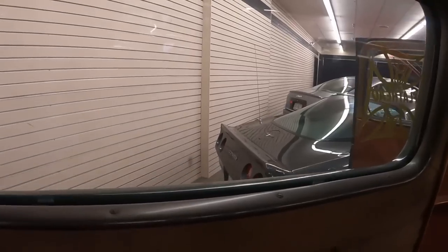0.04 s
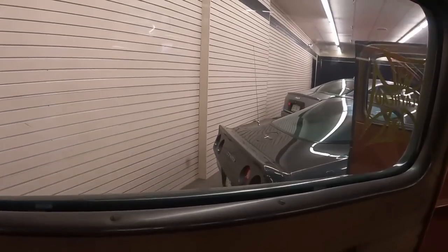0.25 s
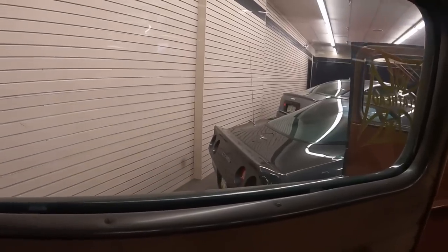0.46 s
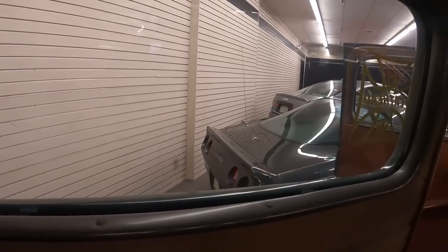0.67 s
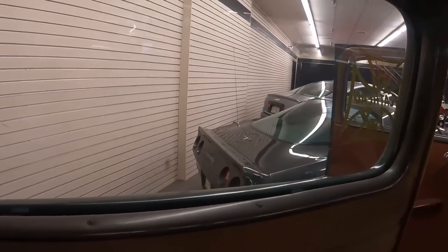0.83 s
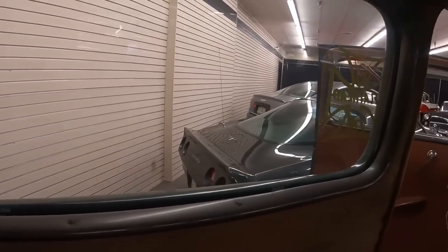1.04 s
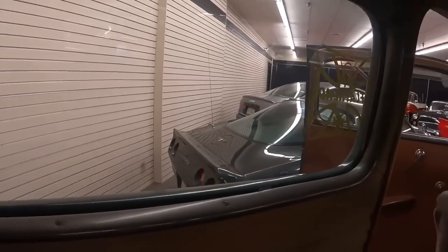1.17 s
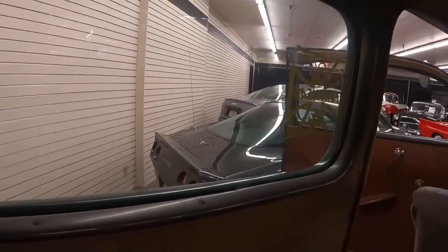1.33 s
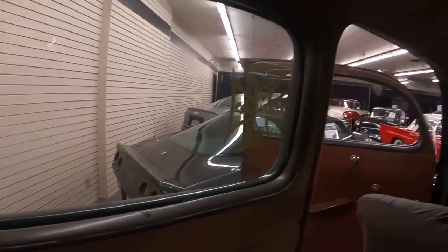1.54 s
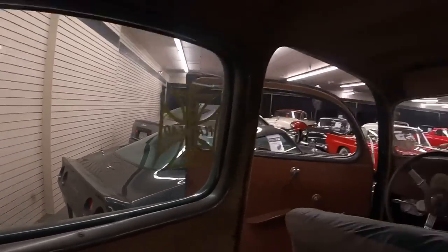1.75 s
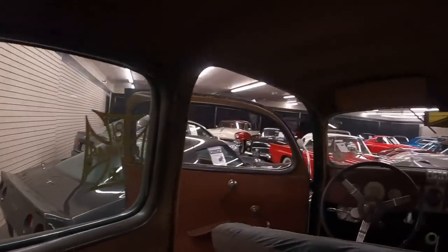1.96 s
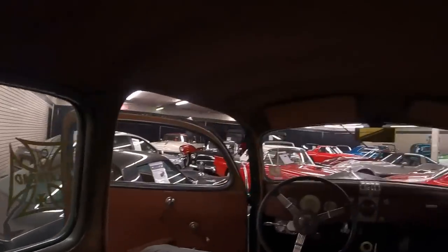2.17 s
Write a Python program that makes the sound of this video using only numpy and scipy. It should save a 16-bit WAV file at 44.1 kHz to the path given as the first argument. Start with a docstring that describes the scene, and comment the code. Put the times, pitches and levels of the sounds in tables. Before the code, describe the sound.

Inside an old car, a window crank turns close to the microphone; the door booms dully, glass rubs and squeals in bursts, the mechanism clicks, then near silence with faint rustle and quiet hall hiss.

```python
"""A side window is wound by its crank inside an old car, heard close by in stereo, then comes to rest.
The door panel and cabin boom (shaped noise); the glass scrapes in its channel (three bands of rubbing noise).
Where the glass binds it judders into a rough squeal: overtones on one unsteady pitch over a gated rasp.
The mechanism ticks now and then (short ringing noise bursts); behind it a quiet hall hisses and
a faint rustle follows as things settle."""
import sys
import numpy as np
from scipy import signal
from scipy.fft import rfft, irfft, next_fast_len
from scipy.io import wavfile
from scipy.ndimage import uniform_filter1d, map_coordinates

SR = 44100
rng = np.random.default_rng(int(sys.argv[2]) if len(sys.argv) > 2 else 0)


def file_out(sig):
    """Save sig as 16-bit WAV at sys.argv[1]."""
    # one column per channel
    cols = np.atleast_2d(sig).T
    # limit, then scale
    lim = np.clip(cols, -1, 1)
    pcm = np.round(lim * 32767).astype(np.int16)
    wavfile.write(sys.argv[1], SR, pcm)


N = 97020  # samples, 2.2 s

# Boom of the door over time: time_s, deep_level_db, panel_low_level_db, panel_high_level_db
BOOM_LEVELS = [(0.0, -34.5, -48.5, -51.5), (0.05, -33.5, -57, -42), (0.14, -32, -32.5, -48),
               (0.2, -36.5, -40, -47.5), (0.24, -26.5, -29.5, -33.5), (0.36, -28, -51, -40.5),
               (0.43, -23.5, -28, -28), (0.48, -22.5, -24, -37), (0.52, -20, -29, -25),
               (0.6, -43, -25, -37), (0.63, -33.5, -25, -33), (0.7, -32.5, -32, -38),
               (0.77, -29, -37, -31.5), (0.8, -26, -28, -31.5), (0.87, -36, -39.5, -40.5),
               (0.92, -26, -21.5, -28), (0.99, -24, -33.5, -23), (1.04, -23, -16.5, -27.5),
               (1.1, -26, -23, -37), (1.15, -34.5, -26, -27), (1.22, -32.5, -24, -24.5),
               (1.33, -34, -39, -32.5), (1.36, -31.5, -22, -39.5), (1.41, -34.5, -25, -30.5),
               (1.46, -46, -30, -34), (1.52, -26.5, -54, -42), (1.57, -38, -41.5, -38.5),
               (1.68, -37, -51, -55.5), (1.95, -39, -48.5, -44), (2.05, -49.5, -59, -62),
               (2.2, -37, -69, -52)]
# Spectrum of the deep cabin air: freq_hz, relative_density_db (per Hz)
CABIN_AIR_SPECTRUM = [(10, -38.5), (22, -14), (32, -6), (42, -3), (54, 4), (66, -6), (80, -26.5),
                      (120, -90.5)]
# Spectrum of the panel's modes: freq_hz, relative_density_db (per Hz)
PANEL_SPECTRUM = [(45, -46.5), (64, -6.5), (75, -13), (91, 5.5), (105, -19.5), (125, -8), (149, -12.5),
                  (176, -13.5), (200, -34), (260, -41.5), (400, -120)]
PANEL_SPLIT_HZ = 110  # between the panel's low and high modes


def boom():
    """Cabin air and door panel shaken by the crank: low noise shaped by their modes."""
    deep_db, *panel_db = curves(BOOM_LEVELS)
    deep = even(rush(gain_of(CABIN_AIR_SPECTRUM), grain_db=0), size=5000)
    out = amp(deep_db) * deep
    for level_db, gain in zip(panel_db, halves(PANEL_SPECTRUM, PANEL_SPLIT_HZ)):
        modes = even(rush(gain, grain_db=0.5), size=4000)
        out = out + amp(level_db + 1.3 * wobble(13.44)) * modes
    return out


# Rubbing over time, middle and hiss before a fixed lift:
# time_s, low_grind_level_db, high_grind_level_db, middle_level_db, hiss_level_db
RUB_LEVELS = [(0.0, -59, -55, -62, -69), (0.02, -56.5, -67, -64.5, -68.5), (0.08, -49, -53.5, -63.5, -63.5),
              (0.12, -52, -61.5, -56, -63.5), (0.15, -43.5, -52.5, -53, -63), (0.2, -52, -55.5, -66, -64),
              (0.24, -46.5, -48.5, -61, -59), (0.38, -33.5, -48, -46, -57), (0.42, -44.5, -49, -58, -61),
              (0.51, -39.5, -48.5, -55.5, -61), (0.57, -42, -48, -58.5, -62.5),
              (0.65, -51.5, -59.5, -59.5, -63.5), (0.69, -45, -48, -53.5, -63),
              (0.78, -44.5, -52, -50, -64), (0.85, -48, -58.5, -57, -64.5), (0.884, -46, -51, -62, -61),
              (0.896, -43, -44.5, -52, -58.5), (0.96, -32, -38.5, -50, -57), (1.0, -29, -36, -48, -55.5),
              (1.03, -43.5, -51.5, -59, -63), (1.11, -33, -45, -43, -64.5), (1.14, -41, -47.5, -49.5, -71),
              (1.19, -31.5, -33, -35.5, -71.5), (1.26, -45.5, -57.5, -70, -71),
              (1.32, -54, -56, -66.5, -66), (1.4, -45.5, -45.5, -43, -62), (1.42, -26.5, -37, -41.5, -56.5),
              (1.47, -40.5, -50, -72, -72.5), (1.57, -52.5, -67.5, -74, -75), (1.66, -69, -83, -77.5, -80),
              (1.71, -63, -76.5, -75, -76), (1.84, -66, -77.5, -85.5, -87),
              (1.99, -56, -71.5, -75.5, -78.5), (2.03, -67.5, -80, -87.5, -95),
              (2.17, -67.5, -82, -79.5, -76.5), (2.2, -58, -68, -70.5, -65)]
# Spectrum of the grind: freq_hz, relative_density_db (per Hz)
GRIND_SPECTRUM = [(120, -37), (200, -1.5), (243, 3.5), (344, -10.5), (417, -12.5), (515, -15.5), (559, -20),
                  (679, -19.5), (750, -27), (980, -50), (1650, -120)]
# Spectrum of the middle rub: freq_hz, relative_density_db (per Hz)
MIDDLE_SPECTRUM = [(600, -38), (800, 1.5), (1000, -1), (1270, 5), (1450, 3.5), (1900, -14.5), (2600, -7.5),
                   (4000, -49)]
# Spectrum of the hiss before the pane's lifts: freq_hz, relative_density_db (per Hz)
HISS_SPECTRUM = [(1180, -21.5), (2000, 3.5), (2440, -6.5), (2720, -1), (3290, -4.5), (3590, -2),
                 (4010, -7.5), (5940, -7), (12000, -25.5), (13200, -35)]
# Resonances of the pane: pitch_hz, width_hz, lift_db
PANE_RESONANCES = [(2450, 79, -4), (3080, 94, 5.5), (3270, 100, -2.5), (4800, 170, 4), (6000, 120, -5),
                   (6870, 150, 3.5)]
GRIND_SPLIT_HZ = 390  # between the low and high grind


def pane_gain(hz):
    """Response of the hiss, lifted in a bell around each resonance of the glass."""
    lift_db = sum(db / (1 + (2 * (hz - centre) / width) ** 2) for centre, width, db in PANE_RESONANCES)
    return amp(along(HISS_SPECTRUM, hz) + lift_db)


def scrape():
    """Glass rubbing the channel: a low grind, a middle rub and a hiss lifted by the pane's resonances."""
    *grind_db, middle_db, hiss_db = curves(RUB_LEVELS)
    flutter_db = 1.4 * wobble(30.75)  # shared by all the bands
    rub = amp(middle_db + 2) * rush(gain_of(MIDDLE_SPECTRUM), grain_db=1.5)
    rub = rub + amp(hiss_db + 1.5) * rush(pane_gain, grain_db=1.5)
    for level_db, gain in zip(grind_db, halves(GRIND_SPECTRUM, GRIND_SPLIT_HZ)):
        rub = rub + amp(level_db) * rush(gain, grain_db=0.5)
    return amp(flutter_db) * rub


# Squeal over time, levels before a fixed trim:
# time_s, fundamental_level_db, neighbour_level_db, octave_level_db, roughness (0-1)
SQUEAL_LEVELS = [(0.08, -68, -75, -80, 0.47), (0.142, -52.5, -73, -69, 0.54),
                 (0.166, -46.5, -66, -83.5, 0.54), (0.24, -86, -63, -75.5, 0.31),
                 (0.314, -54, -48.5, -73, 0.3), (0.334, -56, -62, -69, 0.54), (0.37, -50, -46, -45, 0.44),
                 (0.394, -52, -44, -65, 0.37), (0.416, -63, -69.5, -72, 0.53),
                 (0.514, -63, -59.5, -74, 0.42), (0.582, -59, -61, -66, 0.46), (0.602, -53, -63, -64, 0.41),
                 (0.613, -40, -42.5, -46.5, 0.15), (0.63, -50, -52, -56, 0.28),
                 (0.656, -51, -67, -54, 0.53), (0.688, -45, -52, -61, 0.5),
                 (0.712, -33.5, -37, -31.5, 0.44), (0.75, -41, -62, -43, 0.3),
                 (0.775, -40, -45.5, -49, 0.64), (0.798, -41.5, -37, -37.5, 0.54),
                 (0.83, -41.5, -45, -58, 0.37), (0.864, -54, -60, -71, 0.44), (0.9, -46.5, -41, -65, 0.35),
                 (0.95, -41, -66, -64, 0.22), (0.994, -47.5, -42, -47.5, 0.36),
                 (1.018, -46, -49.5, -62, 0.31), (1.064, -40, -52, -48.5, 0.22),
                 (1.088, -38.5, -37, -33.5, 0.38), (1.148, -30, -36, -28, 0.35),
                 (1.19, -30, -32, -30.5, 0.65), (1.234, -45, -46, -69.5, 0.4),
                 (1.266, -59.5, -70.5, -72, 0.29), (1.324, -66, -69, -79, 0.3),
                 (1.368, -30, -48, -30, 0.38), (1.39, -27, -33, -26, 0.19),
                 (1.426, -35, -45.5, -38.5, 0.54), (1.45, -49, -56, -65.5, 0.8), (1.48, -66, -72, -82, 0.9)]
# Centre of the unsteady pitch: time_s, pitch_hz
SQUEAL_PITCH = [(0.6, 810), (0.76, 804.5), (0.8, 858), (0.9, 819), (1.15, 805), (1.19, 824.5),
                (1.37, 828.6), (1.42, 820)]
# Higher overtones, before a fixed trim: multiple of the pitch, relative_level_db
OVERTONES = [(3, 2.5), (4, -0.5), (5, -5), (6, 0), (7, -10.5), (8, -7.5), (9, -17.5), (10, -17.5)]
# One list per squeak: time_s, lower_rasp_level_db, upper_rasp_level_db, overtones_over_rasp_db (before trim)
SQUEAKS = [
    [(0.68, -69, -65, -11), (0.706, -53, -74, -10.5), (0.714, -48.5, -59, 6.5), (0.728, -44.5, -66, 1.5),
     (0.742, -59.5, -74, -1.5), (0.786, -61, -68, -8), (0.8, -46.5, -70, -1.5), (0.83, -74, -70, -8)],
    [(1.06, -65, -72, -8.5), (1.09, -42, -62.5, -7), (1.098, -45, -58, -8), (1.11, -55, -67.5, 5),
     (1.142, -39.5, -46, 3), (1.156, -46, -60, 4.5), (1.184, -38.5, -47, -2.5), (1.204, -50, -61, -11),
     (1.24, -75, -78, -12.5)],
    [(1.34, -72, -66.5, -14.5), (1.356, -61, -73.5, -2.5), (1.372, -41.5, -52, 4.5),
     (1.39, -45.5, -53.5, 3), (1.414, -44, -63, -8.5), (1.44, -56, -68, -12.5), (1.47, -77.5, -77, -12)],
]
# Response of the rasp: freq_hz, relative_level_db
RASP_SPECTRUM = [(1200, -17.5), (2000, -0.5), (3000, 0.5), (4100, -6), (4200, 7), (6000, -2), (9000, -16),
                 (13000, -34.5)]
RASP_SPLIT_HZ = 4150  # between the lower and upper rasp
NEIGHBOUR_HZ = 894.7  # a second mode of the pane, beating with the first
SUM_TONE_DB = -11.5  # sum tone of both modes, relative to the octave
DRIFT_HZ, JITTER_HZ = 5, 25.87  # scale of the slow pitch drift; of the fast jitter at full roughness
SMEAR_RATE = 129.8  # knots a second in the fundamental's smear


def flutter(rate):
    """A random complex curve of rms 1 that smears the tone it multiplies."""
    return unit(wobble(rate) + 1j * wobble(rate))


def squeal():
    """Stick-slip judder: overtones share one unsteady pitch, each smeared alone, over a rasp gated by slips."""
    first_db, neighbour_db, octave_db, rough = curves(SQUEAL_LEVELS)
    s = np.arange(N) / SR
    drift = DRIFT_HZ * wobble(18)
    jitter = JITTER_HZ * rough * wobble(160)
    phase = 2 * np.pi * np.cumsum(curves(SQUEAL_PITCH)[0] + drift + jitter) / SR

    def partial(k):
        """Overtone k: roughness trades its steady part for smear, faster in higher overtones."""
        smear = np.sqrt(1 - rough) + np.sqrt(rough) * flutter(SMEAR_RATE * np.sqrt(k))
        return smear * np.exp(1j * k * phase)

    neighbour = np.exp(2j * np.pi * NEIGHBOUR_HZ * s) * even(flutter(69.86))
    sum_tone = amp(SUM_TONE_DB) * neighbour * np.exp(1j * phase)
    tone = amp(first_db + 1.5) * even(partial(1))
    tone = tone + amp(neighbour_db + 3) * neighbour
    tone = tone + amp(octave_db - 1.0) * even(partial(2) + sum_tone)

    gritty = 0
    for k, db in OVERTONES:
        patches = amp(db - 7 + 4.0 * wobble(60.4))
        gritty = gritty + patches * even(partial(k), size=500).real

    slips = 1 + np.cos(phase)  # opens the rasp once per cycle of the pitch
    rasp = unit(filtered(rng.standard_normal(N) * slips, gain_of(RASP_SPECTRUM)))
    # each squeak is silent outside its own rows
    lower, upper, clear = sum(amp(curves(rows)) * between(rows) for rows in SQUEAKS)
    grit = clear * gritty + amp(1.66 * wobble(60.4)) * rasp
    low, high = filtered(grit, lambda hz: np.array([hz < RASP_SPLIT_HZ, hz >= RASP_SPLIT_HZ]))
    return (tone.real + lower * low + upper * high) * between(SQUEAL_LEVELS)


# Contacts in the mechanism, level before rise and air loss:
# start_s, level_db, pitch_hz, t60_s, sharpness (Q of each of two ring filters)
TICKS = [(0.2073, -55.5, 5050, 0.05, 1.4), (0.3021, -38, 4000, 0.015, 0.96),
         (0.306, -45, 3200, 0.017, 1.34), (0.302, -39, 1200, 0.037, 0.81), (0.347, -45, 1800, 0.044, .8),
         (.362, -44.5, 5930, 0.035, 14), (0.3665, -44, 6030, 0.024, 14), (.3690, -36.5, 3510, 0.031, 18),
         (0.365, -38.5, 1660, 0.033, 1.5), (0.371, -34.5, 1700, 0.035, 0.94),
         (0.481, -41, 1600, 0.022, 1.2), (0.498, -39.5, 1500, 0.025, 5), (0.5, -42.5, 3300, 0.011, 4),
         (.5085, -55, 3500, 0.016, 3.3), (0.891, -41, 1440, 0.032, 5.8), (0.890, -34.5, 546, 0.077, 1.4),
         (1.485, -54, 2000, 0.016, 1), (1.5033, -46, 1880, 0.04, 1.34), (1.504, -56, 6510, 0.028, 0.74),
         (1.521, -58, 1970, 0.033, 2.4), (1.556, -60, 6960, 0.026, 3), (1.602, -54, 7400, .015, 2),
         (1.6207, -53.5, 2350, 0.024, 3.9), (1.621, -54.5, 6740, 0.022, 6.1), (1.6581, -68, 6500, 0.018, 1),
         (1.7226, -53.5, 7260, 0.016, 1.2), (1.8991, -46, 6840, 0.017, 2.1),
         (1.9117, -53, 5000, 0.03, 0.61), (1.913, -50.5, 11800, .012, 5), (1.9142, -62.5, 1500, 0.038, 2),
         (1.976, -66.5, 2960, 0.017, 8), (1.988, -62, 2410, 0.018, 5)]
TICK_RISE_S = .0012  # time constant
CRACK_DB, CRACK_T60_S = -24, .0079  # crack relative to its tick


def ticks():
    """Small contacts in the mechanism: a faint crack and a short burst of noise ringing around a pitch."""
    out, t = np.zeros(N + SR), np.arange(SR // 10) / SR
    for start_s, level_db, pitch_hz, t60_s, sharpness in TICKS:
        ring_noise, crack_noise = rng.standard_normal((2, len(t)))
        b, a = signal.iirpeak(pitch_hz, sharpness, SR)
        shape = amp(-60 * t / t60_s) * (1 - np.exp(-t / TICK_RISE_S))
        ring = signal.lfilter(b, a, signal.lfilter(b, a, ring_noise)) * shape
        ring = ring * np.linalg.norm(shape) / np.linalg.norm(ring)  # same energy for any sharpness
        crack = amp(CRACK_DB - 60 * t / CRACK_T60_S) * crack_noise
        out[round(start_s * SR):][:len(t)] += amp(level_db) * (ring + crack)
    return filtered(out[:N], lambda hz: 1 / (1 + (hz / 9000) ** 4))  # duller treble


# Spectrum of the hall: freq_hz, relative_density_db (per Hz)
HALL_SPECTRUM = [(150, -31), (250, -10), (912, -56), (1740, -13.5), (1920, -13.5), (3680, -36.5),
                 (4710, -16.5), (9310, -24), (10600, -29), (13200, -30.5)]
HALL_DB = -80  # centre of the hall's unsteady level
# Faint high rustle as things settle, centre of its unsteady level: time_s, level_db
RUSTLE_LEVELS = [(1.5, -78.5), (1.592, -78.5), (1.726, -75.5), (1.914, -103), (2.0, -91)]
# Spectrum of the rustle: freq_hz, relative_density_db (per Hz)
RUSTLE_SPECTRUM = [(2500, -23), (4500, -5), (7000, 7.5), (9000, -4), (13000, -11)]


def background():
    """The hall's uneven hiss and a faint rustle after the winding stops, both shaped noise."""
    hiss = rush(lambda hz: amp(along(HALL_SPECTRUM, hz)) * (hz > 500), grain_db=0.5)
    hall = amp(HALL_DB + 1.0 * wobble(4.1)) * hiss
    rustle_db = curves(RUSTLE_LEVELS)[0] + 3.1 * wobble(48)
    rustle = amp(rustle_db) * rush(gain_of(RUSTLE_SPECTRUM), grain_db=3)
    return hall + rustle * between(RUSTLE_LEVELS)


CABIN_DB, CABIN_T60_S = -11, .06  # tail relative to the direct sound, and its decay


def placed(x):
    """A sound from the door with the short tail of the cabin, its stereo image unsteady."""
    t = np.arange(SR // 6) / SR
    tail = rng.standard_normal(len(t)) * amp(-60 * t / CABIN_T60_S)
    mid = x + amp(CABIN_DB) * signal.fftconvolve(x, tail / np.linalg.norm(tail))[:N]
    return stereo(mid, mid * unit(wobble(78)))


# Stereo width at the microphones: freq_hz, side_under_mid_db
STEREO_WIDTH = [(60, -30), (120, -37), (230, -23), (450, -12), (870, -8), (1710, -9), (3340, -4),
                (6520, -9), (12700, -10)]
# Balance of the microphones: freq_hz, left_over_right_db
STEREO_LEAN = [(60, 0.1), (130, 0.1), (280, 0.8), (600, -0.5), (1280, -1), (2760, 0), (5930, 1), (12700, 1)]
STEADY = .4  # share of the side's power that is a fixed lag


def stereo(mid, other):
    """Two microphone ports close together: the side is part quarter-cycle lag of mid, part other."""
    mix = np.sqrt(STEADY) * mid + np.sqrt(1 - STEADY) * other
    side = filtered(mix, lambda hz: -1j * amp(along(STEREO_WIDTH, hz)))
    share = np.array([[.5], [-.5]])  # left gains half the lean, right loses half
    return filtered(np.array([mid + side, mid - side]), lambda hz: amp(share * along(STEREO_LEAN, hz)))


def rush(gain, grain_db):
    """Stereo noise of rms 1, its size flickering in grains."""
    noise = rng.standard_normal((2, N)) * amp(grain_db * wobble(300))
    return unit(stereo(*filtered(noise, gain)))


def even(z, size=1300):
    """A fluttering signal held near rms 1 over size samples."""
    power = np.abs(z) ** 2
    if z.ndim > 1:
        power = power.mean(0)  # both channels share one gain
    return z / np.sqrt(np.abs(uniform_filter1d(power, size=size)) + 1e-6)


def halves(spectrum, split_hz):
    """Gains of the parts of a spectrum below and above a frequency."""
    return [lambda hz, p=p: amp(along(spectrum, hz)) / np.sqrt(1 + ((hz + 1) / split_hz) ** p)
            for p in (16, -16)]


def gain_of(spectrum):
    """The response that follows a table of (Hz, dB)."""
    return lambda hz: amp(along(spectrum, hz))


def filtered(x, response):
    """x times a response of frequency."""
    m = next_fast_len(N + 8192)
    return irfft(rfft(x, m) * response(np.fft.rfftfreq(m, 1 / SR)), m)[..., :N]


def along(points, hz):
    """(Hz, value) points read on a log frequency axis."""
    f, v = np.transpose(points)
    return np.interp(np.log(hz + 1), np.log(f + 1), v)


def curves(rows):
    """One value per sample for each column after the time."""
    s, *cols = np.transpose(rows)
    return [np.interp(np.arange(N) / SR, s, c) for c in cols]


def between(rows):
    """True from the first row's time to the last row's."""
    s = np.arange(N) / SR
    return (s > rows[0][0]) * (s < rows[-1][0])


def wobble(rate):
    """A smooth random curve, rate knots a second."""
    return map_coordinates(rng.standard_normal(3000), [np.arange(N) * rate / SR])


def amp(db):
    """Gain of a dB value."""
    return 10 ** (np.asarray(db) / 20)


def unit(x):
    """Scaled to rms 1."""
    return x / np.sqrt(np.mean(np.abs(x) ** 2) + 1e-20)


def scene():
    """All sources together."""
    return boom() + scrape() + placed(squeal()) + placed(ticks()) + background()


TOP_HZ = 13350


def record(dry):
    """The microphone chain keeps nothing above its band limit."""
    return filtered(dry, lambda hz: hz < TOP_HZ)


dry = scene()
out = record(dry)
file_out(out)
```